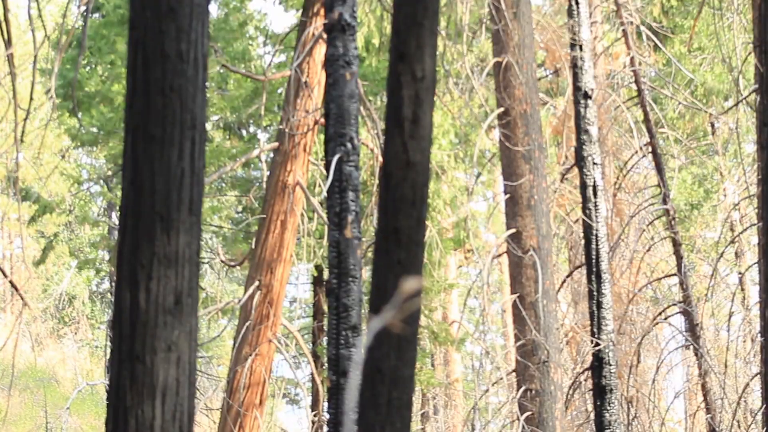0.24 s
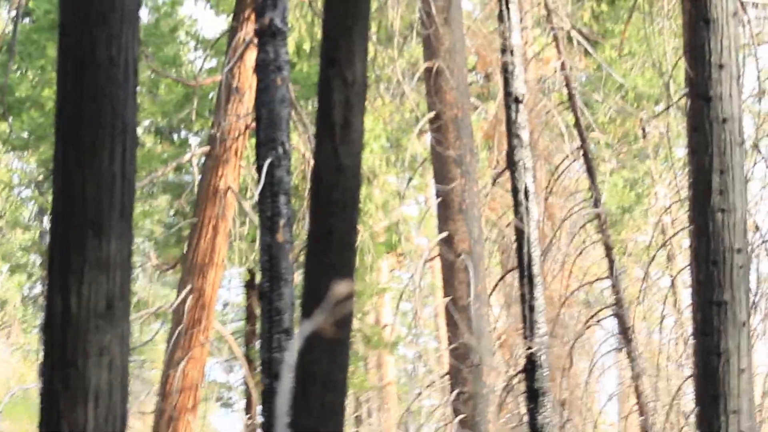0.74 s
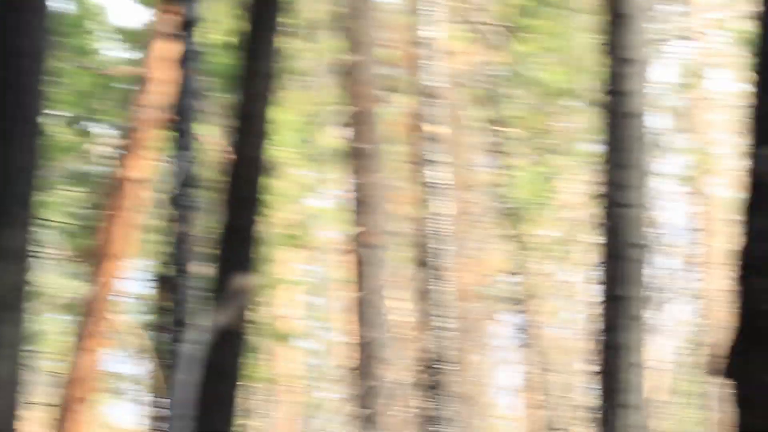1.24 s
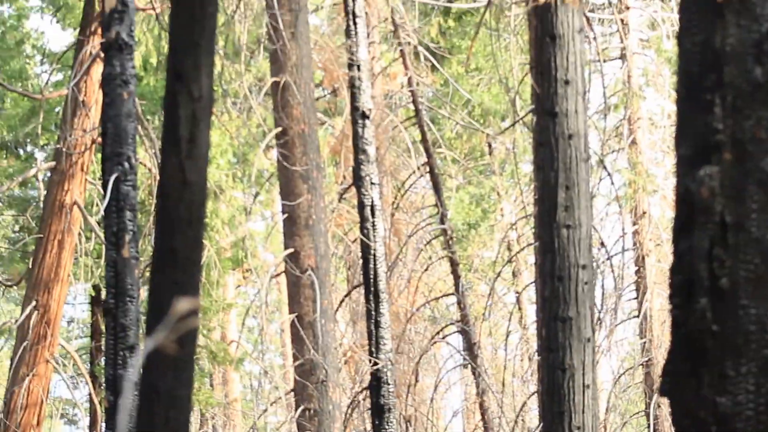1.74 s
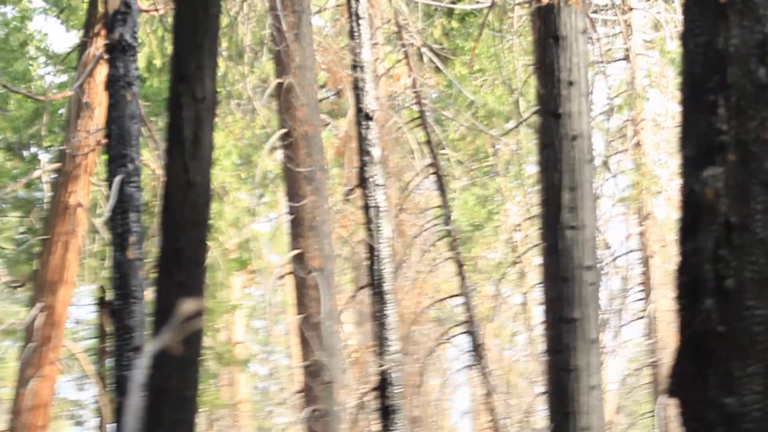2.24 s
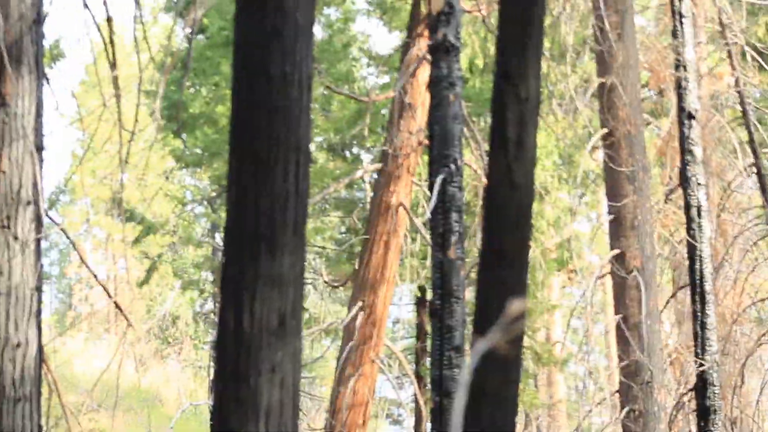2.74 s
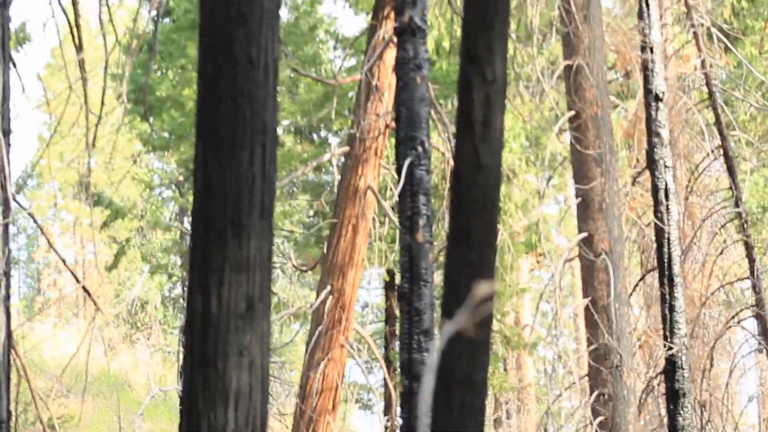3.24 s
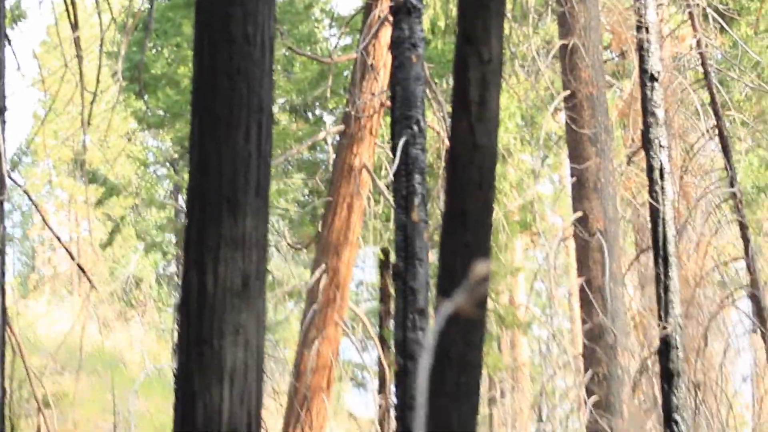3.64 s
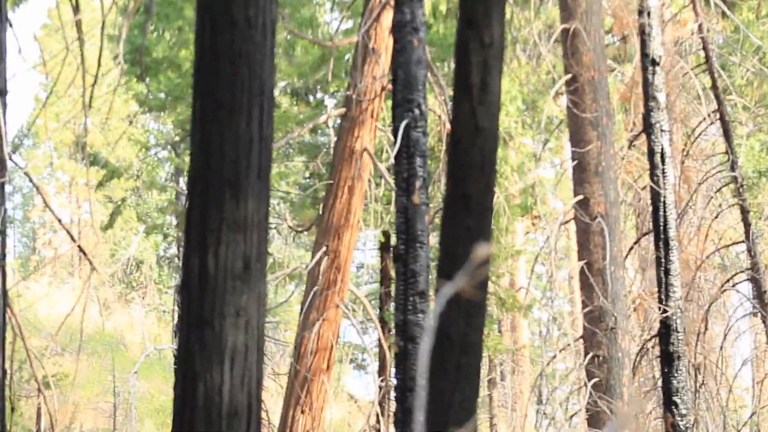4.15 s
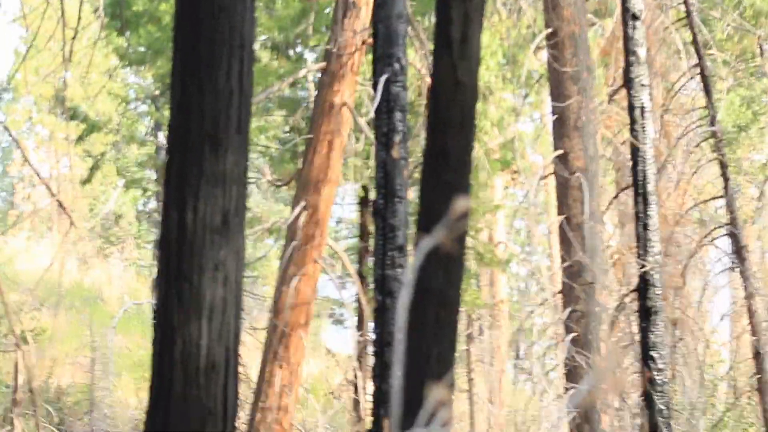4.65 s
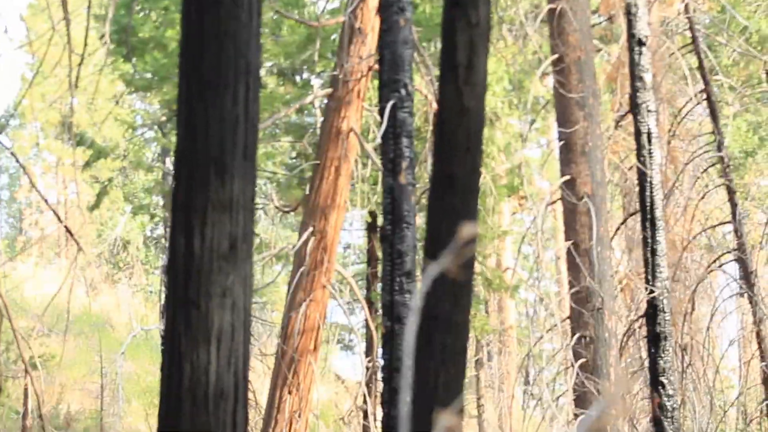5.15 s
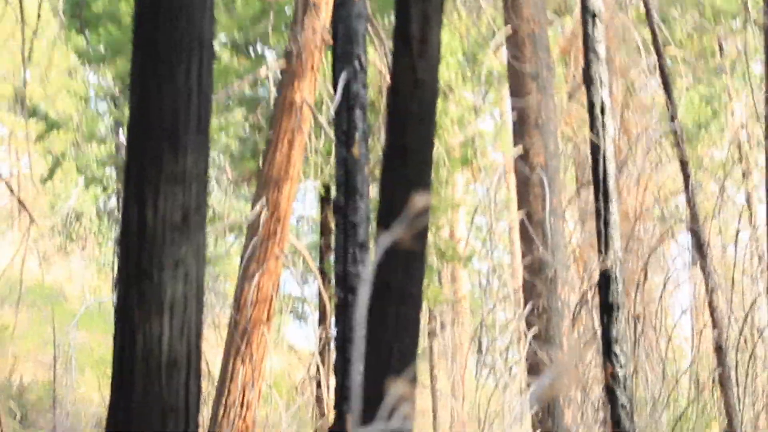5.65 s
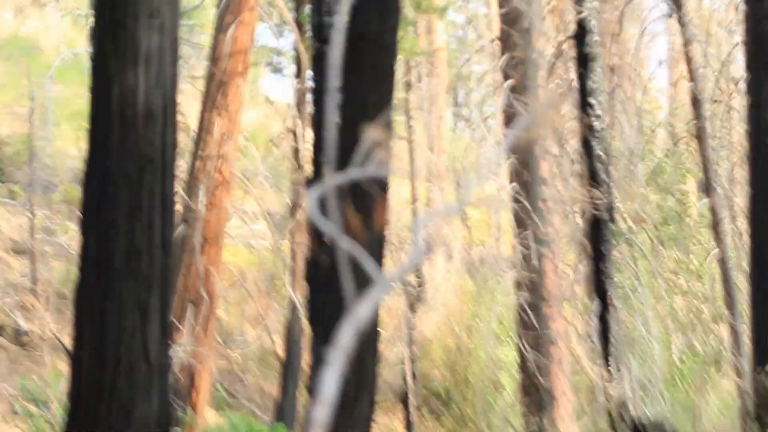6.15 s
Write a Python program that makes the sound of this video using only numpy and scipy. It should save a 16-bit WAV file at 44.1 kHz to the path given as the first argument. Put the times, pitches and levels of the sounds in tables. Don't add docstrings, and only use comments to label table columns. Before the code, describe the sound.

A slow walk over dry litter in a grove, heard close through a small microphone in a plastic housing, over faint forest air and hiss. The dull tail of an earlier crack stops at once at the start, then near quiet. At 0.45 s two hard twig snaps come almost together, and a bough's needles scrape past, fading by 0.9 s. Light ticks and leaf crackle follow, a snap at 1.2 s, small dull knocks to 1.5 s, another snap at 2.0 s and a thinner one near 2.4 s. From 2.5 to 4.1 s it is sparse: small twigs and crisp leaves. At 4.2 s very loud, overloaded cracks begin, crowding until 4.65 s, then more from 4.95 to 5.4 s. After a brief lull come snaps at 5.85 and 6.05 s, with small crackles to the end. Each crack has the same short, boxy ring; the background dips after loud ones.

```python
import sys
import numpy as np
from scipy import signal
from scipy.fft import rfft, irfft
from scipy.io import wavfile

SR = 44100
rng = np.random.default_rng(int(sys.argv[2]) if len(sys.argv) > 2 else 0)


def waveform_to_disk(signal):
    frames = np.transpose(np.atleast_2d(signal))
    scaled = np.clip(frames, -1, 1) * 32767
    samples = np.round(scaled).astype(np.int16)
    wavfile.write(sys.argv[1], SR, samples)


def field_ratio(decibels):
    return 10 ** (np.asarray(decibels, dtype=float) / 20)


N = 281358


def rms_one(x):
    return x / np.sqrt(np.mean(x ** 2) + 1e-20)


def band_filter(low_hz, high_hz):
    return signal.butter(3, [low_hz, min(high_hz, 19000)], "band", fs=SR, output="sos")


def band(x, low_hz, high_hz):
    return signal.sosfilt(band_filter(low_hz, high_hz), x)


def cut_off_crack(at_s=0.0067, hz=1000, peak_db=-24, hiss_db=-41, end_s=0.0076):
    t = np.arange(N) / SR
    bell = np.exp(-((t - at_s) / 0.00053) ** 2)
    knock = -field_ratio(peak_db) * np.cos(2 * np.pi * hz * (t - at_s)) * bell
    hiss = field_ratio(hiss_db) * rms_one(band(rng.standard_normal(N), 280, 3800))
    return knock + hiss * np.clip((end_s - t) / 0.002, 0, 1)


# start in seconds, peak of the main ring in dB,
# panel ring in dB against it, bright tick in dB against it, length of the break in ms.
THICK_TWIGS = [(0.4514, -8, -6.5, -14.5, 3.4), (0.4657, -2.5, -11, -17, 3.2),
               (1.2042, -8.5, -8, -18.5, 2.2), (1.9896, -6, -8, -14, 2.9), (4.1874, 5, -14, -31, 2.2),
               (4.3142, 2, -13, -24, 3.33), (4.4843, -1, -10.5, -35, 2.15), (4.5744, 5.5, -16.5, -22, 1.4),
               (4.6496, -1, -15.5, -21, 3.26), (4.96, -4, -9.5, -25.5, 3.7), (5.1737, -5, -9, -25, 3.1),
               (5.3533, 5, -14, -20.5, 1.9), (5.3724, -5.5, -10.5, -9, 2.8), (5.8624, -3, -12.5, -10, 3.9),
               (6.0496, -3, -13, -12.5, 2.5), (6.0524, 0, -8, -12, 2.45)]
DUCK_DB, RECOVER_S = 19, 0.1
SLOW_DUCK_DB, SLOW_RECOVER_S = 0.97, 1
EARLIER_SNAP_DB = -3.5


def gain_db():
    energy = np.full(N, 1e-12)
    for s, peak_db, *_ in THICK_TWIGS:
        energy[round(s * SR)] += field_ratio(2 * min(peak_db, 0))
    energy[0] += field_ratio(2 * EARLIER_SNAP_DB)
    fast = signal.lfilter([1], [1, -np.exp(-1 / (RECOVER_S * SR))], energy)
    slow = signal.lfilter([1], [1, -np.exp(-1 / (SLOW_RECOVER_S * SR))], energy)
    return -DUCK_DB * fast - SLOW_DUCK_DB * slow


# frequency in Hz, level in dB per Hz.
AIR_COLOUR = [(12, -41), (20, -22), (98, -5), (1020, -3.5), (1150, -4), (1430, -3), (1690, -8), (2500, -5),
              (3130, -7), (3600, -9.5), (6830, -13.5), (13400, -28.5), (15800, -37)]
AIR_DB = -57
HISS_DB = -78.5


def air():
    hz = np.maximum(np.arange(N // 2 + 1) * SR / N, 1)
    colour_hz, colour_db = np.array(AIR_COLOUR).T
    colour = field_ratio(np.interp(np.log(hz), np.log(colour_hz), colour_db))
    rustle = rms_one(irfft(rfft(rng.standard_normal(N)) * colour, N))
    hiss = rms_one(band(rng.standard_normal(N), 5000, 12000))
    return field_ratio(AIR_DB + gain_db()) * rustle + field_ratio(HISS_DB) * hiss


def swell(middle_s, level_db, half_s):
    t = np.arange(0, N, 32) / SR
    return field_ratio(2 * level_db) * np.exp(-((t - middle_s) / max(half_s, 0.005)) ** 2)


# middle in seconds, level in dB, half length in seconds,
# weight of the stir as panel level in dB against the main range.
STIRS = [(0.469, -34.5, 0.012, -9), (.555, -45.5, 0.069, -7), (0.73, -54.5, 0.066, -5.5),
         (0.983, -56.5, 0.11, 0), (1.238, -60.5, 0.056, 10.5), (1.31, -51, 0.052, -18),
         (1.39, -58, .06, 7.5), (1.584, -51.5, 0.053, -6), (1.702, -56, .04, 0),
         (1.766, -48.5, 0.038, -10.5), (1.87, -59.5, 0.092, -15), (2.046, -52, 0.042, -1.5),
         (2.39, -53.5, 0.034, -2.5), (2.648, -58, .05, -7), (3.04, -66, 0.085, 5.5), (3.4, -57, .09, -2.5),
         (3.754, -61, 0.062, -9), (4.145, -61, 0.078, -5), (4.422, -57, 0.043, -7), (4.468, -53, .025, -21),
         (5.004, -58.5, 0.049, -2), (5.202, -51, 0.014, 2.5), (5.287, -59.5, 0.03, 9),
         (5.385, -50.5, 0.024, -1), (5.713, -68, 0.24, -8), (5.918, -54, 0.045, -0.5),
         (6.13, -55, 0.058, -7), (6.174, -49, 0.02, -6), (6.37, -60, 0.024, -4)]
STIR_THUMP_DB, STIR_THUMP_PER_WEIGHT, STIR_TICK_DB = -5.5, 1.4, -13.5
# middle in seconds, level in dB, half length in seconds.
SWISHES = [
    (4.395, -61, 0.066),
    (4.477, -43, 0.013),
]
LITTER_DB = [-68.5, -76.5, -74, -84]


def stir_levels():
    power = field_ratio(2 * (np.array(LITTER_DB)[:, None] + gain_db()[::32]))
    for s, level_db, half_s, weight_db in STIRS:
        thump_db = STIR_THUMP_DB + STIR_THUMP_PER_WEIGHT * weight_db
        shares_db = np.array([0, weight_db, thump_db, STIR_TICK_DB])
        power = power + field_ratio(2 * shares_db)[:, None] * swell(s, level_db, half_s)
    power[3] += sum(swell(*row) for row in SWISHES)
    return np.repeat(np.sqrt(power), 32, axis=1)[:, :N]


def rings(modes):
    hz, level_db, t60 = np.array(modes).T[:, :, None]
    t = np.arange(SR // 5) / SR
    return field_ratio(level_db - 60 * t / t60) * np.sin(2 * np.pi * hz * t)


# frequency in Hz, level in dB, time to fall by 60 dB in seconds.
MAIN = [(2648, 10.5, 0.01), (2426, -3.5, 0.033), (2824, -25.5, 0.023), (3008, -5, 0.022), (3296, 5, 0.0087),
        (3740, -4, 0.0061), (4200, -18, 0.02), (2300, -36.5, 0.27), (3820, -35, 0.11), (3434, -38, 0.23)]
PANEL = [(1499.6, 8, 0.034), (1628, 7.5, 0.031), (1850, 4, 0.022), (1195, 1.5, 0.022), (948, -7.5, 0.04),
         (1555, -20, 0.28), (1286, -10.5, 0.14), (1510, -31.5, 0.075)]
THUMP = [(207.4, -6, 0.032), (305, -13, 0.021), (132.6, -19.5, 0.017), (431.4, -14.5, 0.016)]
TICK = [(6370, 10.5, 0.0075), (6740, -4.5, 0.0096), (5743, -2, 0.014), (8670, -9.5, 0.0052),
        (6870, 0, 0.014), (5150, -31, 0.099)]
SOFT_RING = [(2597, 1.5, 0.042)]
# low edge in Hz, high edge in Hz, dense ring in dB,
# its time to fall by 60 dB in seconds, late ring in dB, its time to fall by 60 dB in seconds.
RANGES = [(2040, 4110, -14, 0.048, -36.5, 0.15), (719, 1915, -5, 0.068, -30.5, 0.27),
          (150, 1095, -8, 0.096, -45.5, 0.33), (4660, 8970, -12, 0.016, -49.5, 0.12)]


def leaves(per_s=3500, size_db=4, broad_db=1):
    out = np.zeros(N)
    for table, span, level in zip((SOFT_RING + MAIN, PANEL, THUMP, TICK), RANGES, stir_levels()):
        low_hz, high_hz = span[:2]
        born = rng.random(N) < per_s / SR
        sizes = field_ratio(size_db * np.minimum(rng.exponential(1, N), 4))
        grains = born * sizes * rng.choice([-1, 1], N)
        dealt = rng.integers(0, len(table), N)
        rung = np.zeros(N)
        for m, mode in enumerate(rings(table)):
            rung += signal.oaconvolve(grains * (dealt == m), mode[:4000])[:N]
        direct = field_ratio(broad_db) * rms_one(band(grains, low_hz, high_hz))
        crackle = band(rms_one(rung) + direct, 0.61 * low_hz, 0.91 * high_hz)
        out += level * rms_one(crackle)
    return out


# start in seconds, peak of the main ring in dB, panel ring in dB against it,
# bright tick in dB against it, length of the break in ms.
THIN_TWIGS = [(1.002, -16, -21, -40, 1.7), (1.181, -28, 1.5, -29, .6), (1.3952, -27, -13, -32, 0.3),
              (1.6545, -18, -1, -28, 0.51), (1.8029, -29.5, -29, -28, 0.27), (2.3387, -26, -8, -14, 4.1),
              (2.3615, -12.5, -5.5, -25, 3.7), (2.6597, -28, -0.5, -41, 0.29),
              (2.9909, -19, -4.5, -16.5, 4.7), (3.411, -26, -12.5, -22, 1.7),
              (3.634, -14.5, -6.5, -27.5, 2.7), (3.7805, -20, -3.5, -19, 3.5), (3.981, -17, -3.5, -12.5, 3),
              (4.2308, -13.5, -8, -20, 2.3), (4.3354, -12, -7.5, -38.5, 2.3),
              (4.4182, -14.5, -14, -26, 4.1), (4.949, -30, -7, -15, 5.1), (4.9788, -21, -4.5, -18.5, 5.7),
              (5.1952, -23, -2.5, -19, 1.5), (5.2647, -27.5, -10, -17.5, 6.4),
              (5.3174, -30.5, -3, -21, 5.7), (5.3469, -22.5, -2, -18, 3.7), (6.1025, -14, -5, -21.5, 2.3),
              (6.2226, -13, -13.5, -16, 1.3)]
TWIG_THUMP_DB, THUMP_PER_PANEL = -11.5, 1.97
# start in seconds, peak in dB, bright tick in dB against it.
STALKS = [(0.5564, -33, -27), (0.702, -48, -22), (0.8395, -38.5, -18), (.925, -36.5, -6.5),
          (1.0095, -27, -19), (1.0512, -39, -25), (1.0585, -41, -27), (1.5883, -51, -20),
          (1.6394, -38, -14), (1.7157, -35.5, -27), (1.8244, -36, -19), (1.8403, -42, -21),
          (1.858, -42, -20), (1.927, -34.5, -15), (2.455, -41, -23), (2.5932, -37.5, -28),
          (2.6145, -43, -25), (2.7783, -44, -22), (2.825, -38, -14), (2.8406, -42, -19), (3.0713, -41, -18),
          (3.0918, -38.5, -16), (3.107, -46, -20), (3.113, -40, -23), (4.8414, -70, 1), (5.5823, -44, -22),
          (5.7038, -36, -34), (6.02, -30, -21), (6.151, -36, -5)]
STALK_PANEL_DB, STALK_THUMP_DB, STALK_MS = -21.5, -28.5, 2.5
# start in seconds, peak in dB, bright tick in dB against it.
LEAF_CRACKS = [(0.4383, -45, -12), (0.5904, -38.5, -18), (0.724, -43, -3), (0.809, -38, -6.5),
               (0.941, -35, -13), (1.409, -55, -5), (1.4435, -55, -5), (1.5832, -45, -21),
               (2.1058, -46, -23), (3.2778, -37, -14), (3.296, -31.5, -16), (3.326, -41, -29),
               (3.3995, -35.5, -8), (3.485, -38, -26), (4.166, -51, 9), (4.252, -52, 3.5), (4.408, -38, -8),
               (4.454, -32, -19), (4.462, -35.5, -19), (4.5586, -32, -28.5), (4.939, -30.5, -14),
               (5.1642, -42, -21), (5.213, -35.5, -10.5), (5.235, -32.5, -21), (5.2893, -30, -21),
               (5.3153, -44, 0), (5.6673, -41, -43), (5.7244, -40, -16), (6.251, -33, -30),
               (6.3643, -43, -21), (2.3595, -19.5, -26)]
CRACK_PANEL_DB, CRACK_THUMP_DB, CRACK_MS = -4.5, -15, 4.6
# start in seconds, peak in dB,
# panel ring in dB against it, thump in dB against it.
KNOCKS = [(1.273, -29.5, 6, -28), (1.3018, -44, -17, 0), (1.3554, -37, 5, -2), (1.362, -42, 13, -18),
          (1.386, -35.5, 12.5, -4), (1.4216, -43, 9.5, 6), (1.5301, -53, -1, 14), (2.225, -47, 2, 2),
          (2.386, -41, 11, 3.5), (2.977, -51, -7, 10), (5.061, -45.5, 12, -21.5), (5.068, -51, 4, -24),
          (5.4054, -34, 1.5, -13), (5.6878, -49, 1.5, -7), (5.95, -44.5, 4.5, 1.5), (6.1408, -30, 1.5, -15),
          (6.262, -42, 4, -4), (1.162, -40, 1, -17), (1.492, -49, 2, 7), (1.323, -49, 0, 5)]
KNOCK_TICK_DB, KNOCK_MS = -25, 0.73


def all_breaks():
    breaks = []
    for s, db, panel, tick, ms in THICK_TWIGS + THIN_TWIGS:
        breaks.append((s, db, panel, TWIG_THUMP_DB + THUMP_PER_PANEL * panel, tick, ms))
    for s, db, tick in STALKS:
        breaks.append((s, db, STALK_PANEL_DB, STALK_THUMP_DB, tick, STALK_MS))
    for s, db, tick in LEAF_CRACKS:
        breaks.append((s, db, CRACK_PANEL_DB, CRACK_THUMP_DB, tick, CRACK_MS))
    for s, db, panel, thump in KNOCKS:
        breaks.append((s, db, panel, thump, KNOCK_TICK_DB, KNOCK_MS))
    return breaks


def dense_ring(noise, early_db, early_t60, late_db, late_t60):
    t = np.arange(len(noise)) / SR
    return noise * (field_ratio(early_db - 60 * t / early_t60) + field_ratio(late_db - 60 * t / late_t60))


CLEAN_BREAK_MS = 2.7
RISE_SHARE, SOFT_RISE_MS = 0.22, 0.98


def snaps(spread_db=1.5, fibre_share=0.3):
    out = np.zeros(N + SR)
    t_ms = np.arange(600) / SR * 1000
    groups = [rings(g) for g in (MAIN, PANEL, THUMP, TICK)]
    soft = rings(SOFT_RING)[0]
    noises = [rms_one(band(rng.standard_normal(N + SR), *span[:2])) for span in RANGES]
    filters = [band_filter(1.049 * span[0], 1.065 * span[1]) for span in RANGES]
    for s, peak_db, panel_db, thump_db, tick_db, ms in all_breaks():
        size, mark = rng.standard_normal((2, 600))
        fibres = np.abs(mark) < fibre_share
        burst = 0.25 * size * fibres * np.exp(-(t_ms / max(ms, 0.1)) ** 2)
        burst[[0, 17]] += np.array([0.45, 1]) * min(1, (CLEAN_BREAK_MS / max(ms, 0.1)) ** 2)
        at = round(s * SR)
        faint = np.clip(-peak_db / 25, 0, 1)
        rise = 1 - np.exp(-t_ms / max(RISE_SHARE * ms + SOFT_RISE_MS * faint, 0.02))
        levels_db = (0, panel_db, thump_db, tick_db)
        for modes, noise, level_db, span, sos in zip(groups, noises, levels_db, RANGES, filters):
            strike = field_ratio(spread_db * rng.standard_normal(len(modes)))
            start = int(abs(rng.standard_normal()) * SR)
            body = strike @ modes + dense_ring(noise[start:start + modes.shape[1]], *span[2:])
            if modes is groups[0]:
                body = body + faint * np.clip(-panel_db / 12, 0, 3) * soft
            wave = signal.sosfilt(sos, signal.fftconvolve(body, burst))
            wave[:len(t_ms)] *= rise
            out[at:at + len(wave)] += field_ratio(peak_db + level_db) * wave / np.abs(wave).max()
    return out[:N]


def drift(rate_hz):
    knots = rng.standard_normal(int(N / SR * 60) + 2)
    return np.interp(np.arange(N) / SR * rate_hz, np.arange(len(knots)), knots)


# time in seconds, level in dB.
DRAG = [
    (.45, -78),
    (.5, -48),
    (.56, -43.5),
    (.8, -51.5),
    (.93, -60),
]
# frequency in Hz, width in Hz, level in dB.
DRAG_PEAKS = [(2825, 370, -1.5), (3230, 500, -5), (4270, 840, -11), (7000, 280, -18), (7290, 360, -20.5)]


def drag(flutter_db=0.5):
    rub, out = rng.standard_normal(N), np.zeros(N)
    for hz, width_hz, level_db in DRAG_PEAKS:
        out += field_ratio(level_db) * rms_one(band(rub, hz - width_hz / 2, hz + width_hz / 2))
    t = np.arange(N) / SR
    times_s, levels_db = np.array(DRAG).T
    level_db = np.interp(t, times_s, levels_db) + flutter_db * drift(49.9)
    return (t < times_s[-1]) * field_ratio(level_db) * rms_one(out)


def scene():
    return (cut_off_crack() + air() + leaves() + snaps() + drag())[None]


def roll_off(x):
    return signal.sosfilt(signal.butter(12, 15940, fs=SR, output="sos"), x)


def record(dry):
    clip_level = 1.0
    lost = dry - np.clip(dry, -clip_level, clip_level)
    lost = signal.sosfilt(signal.butter(2, 500, "high", fs=SR, output="sos"), lost)
    return roll_off(np.clip(dry - lost, -clip_level, clip_level))


dry = scene()
out = record(dry)
waveform_to_disk(out)
```